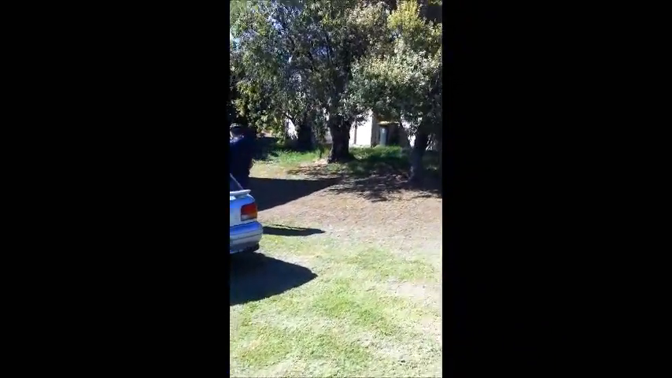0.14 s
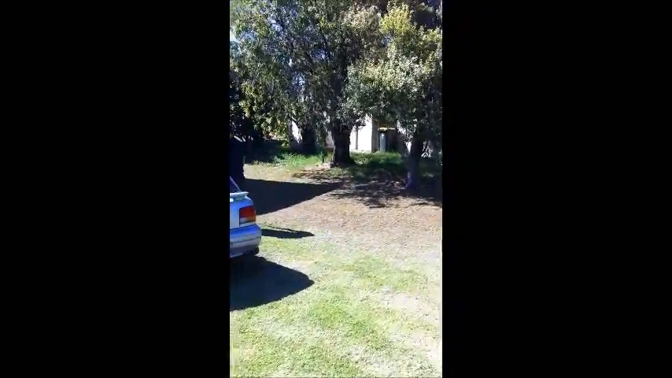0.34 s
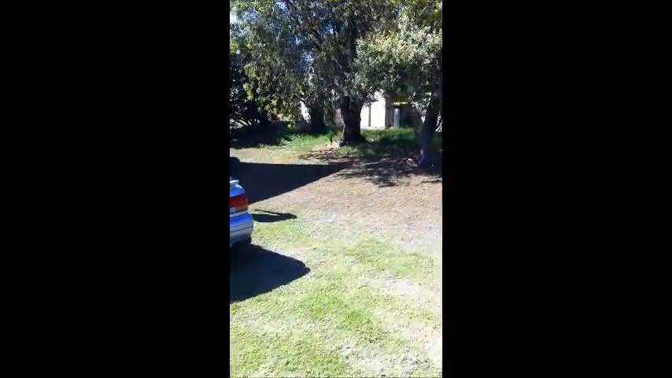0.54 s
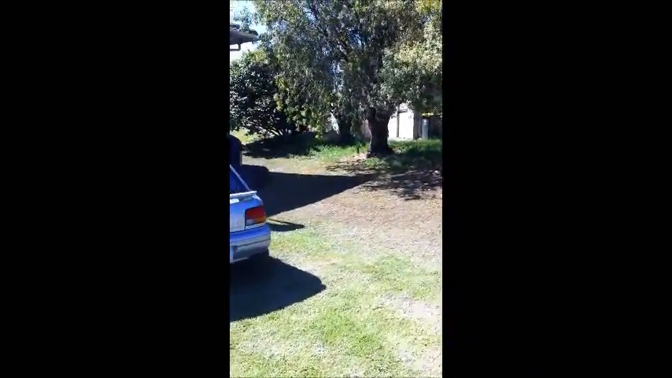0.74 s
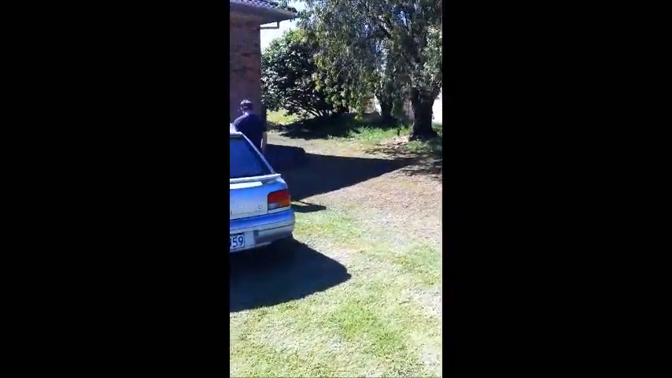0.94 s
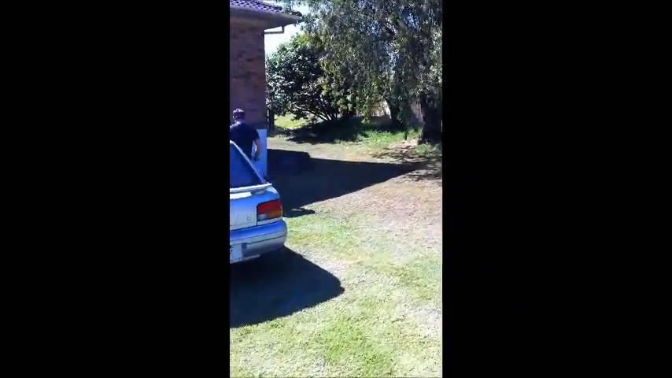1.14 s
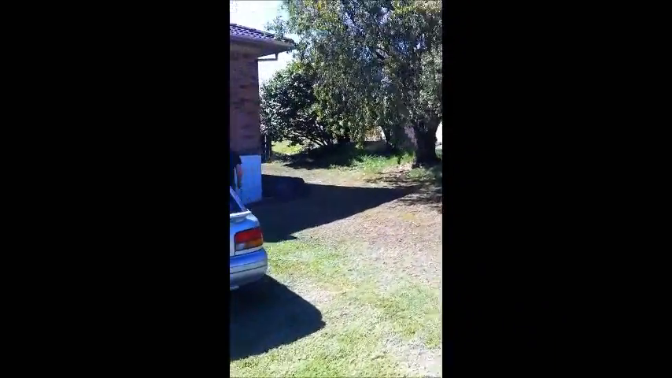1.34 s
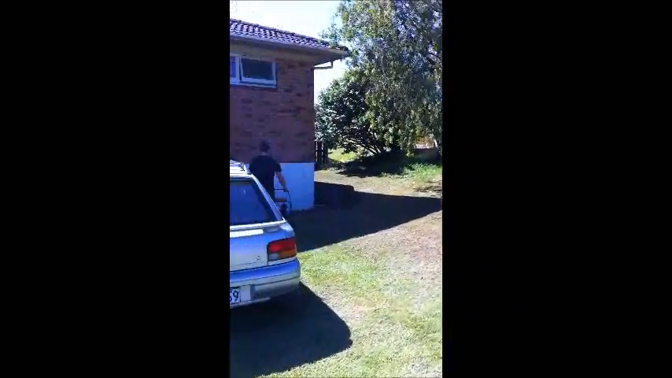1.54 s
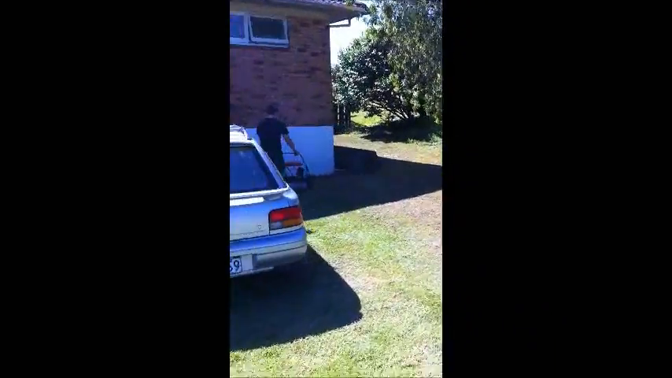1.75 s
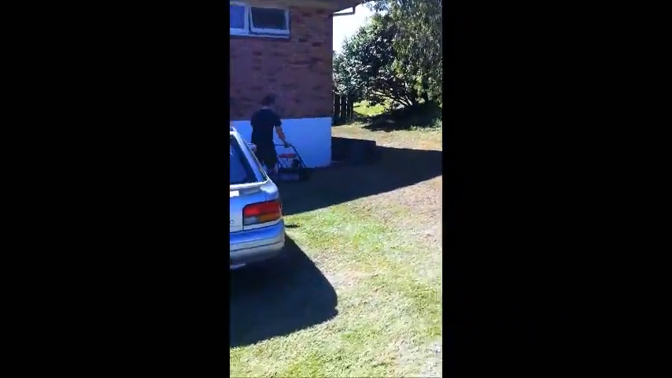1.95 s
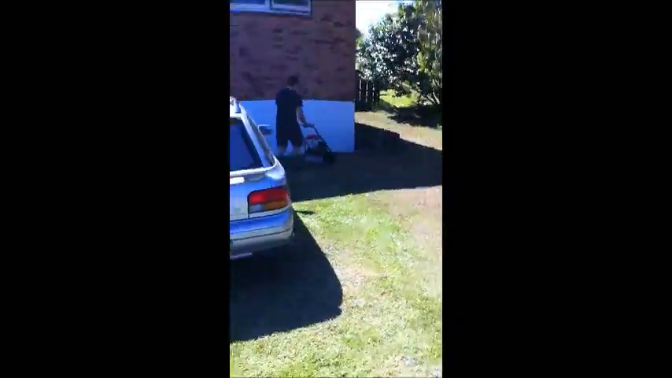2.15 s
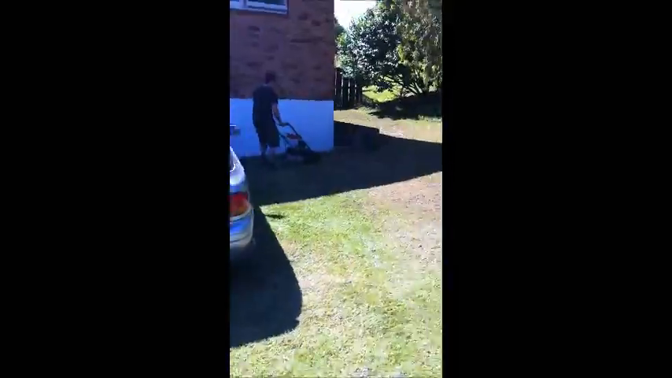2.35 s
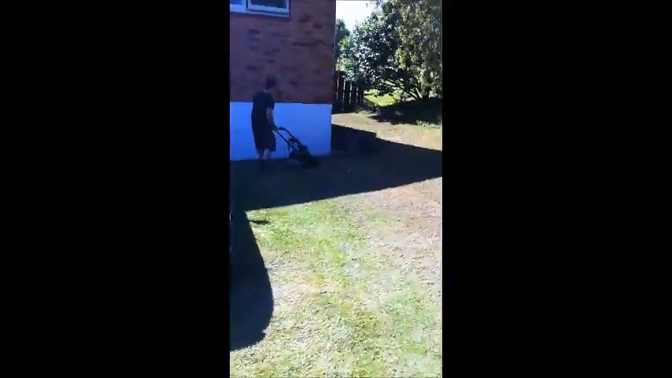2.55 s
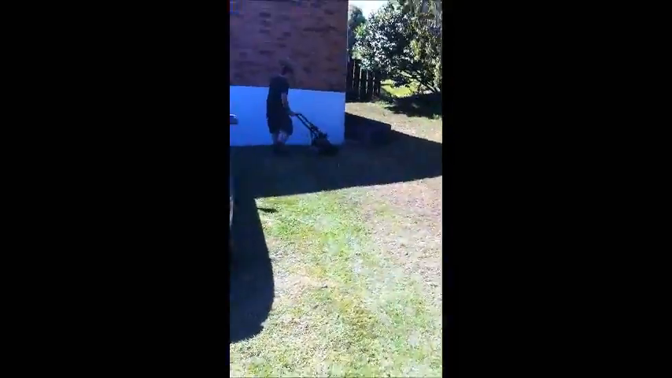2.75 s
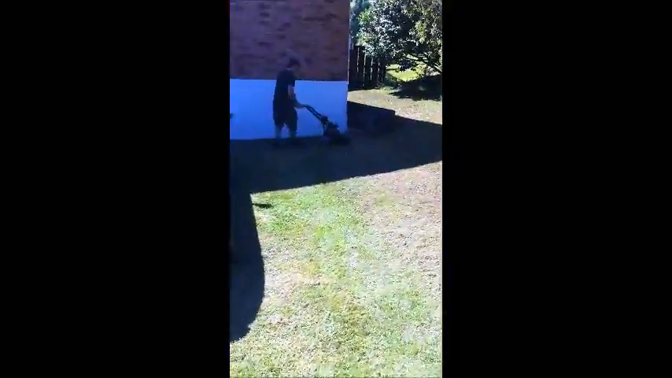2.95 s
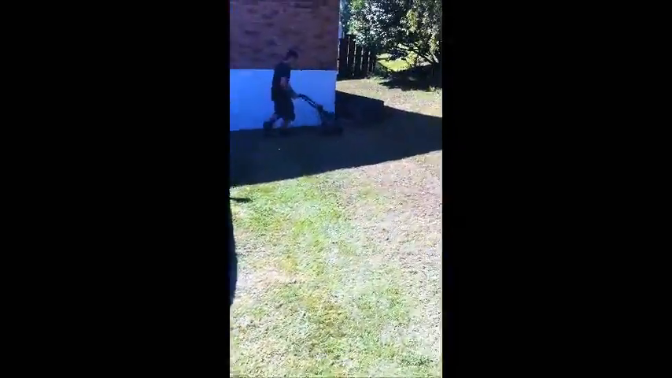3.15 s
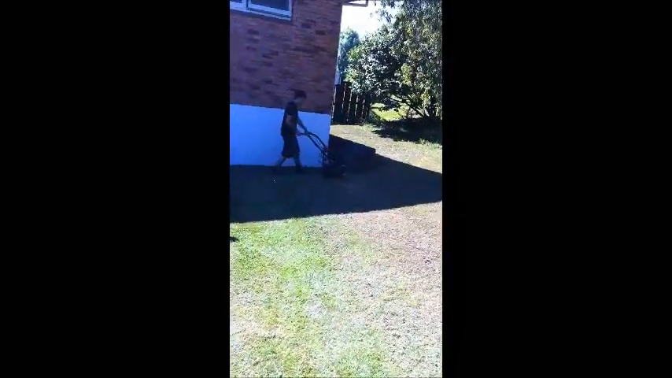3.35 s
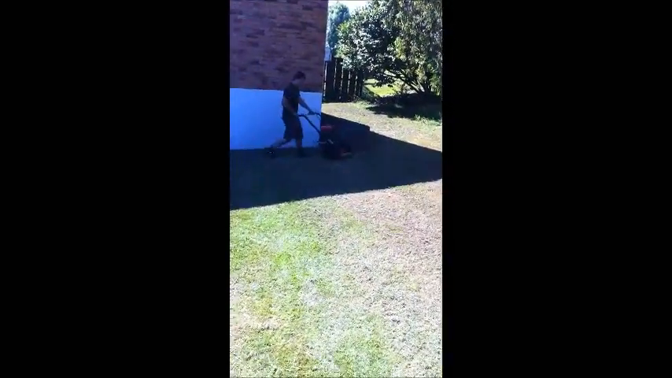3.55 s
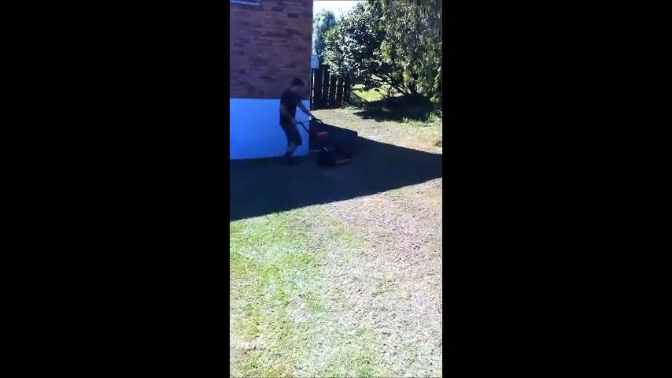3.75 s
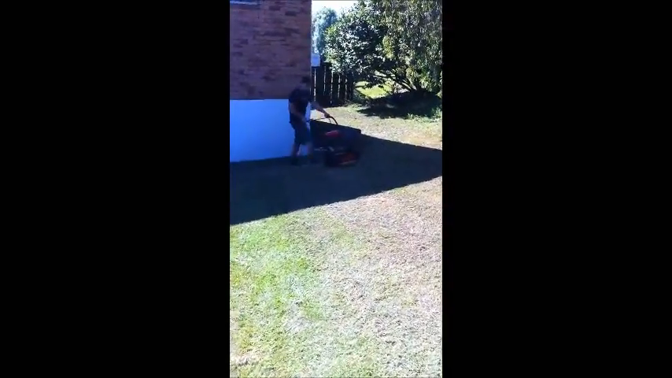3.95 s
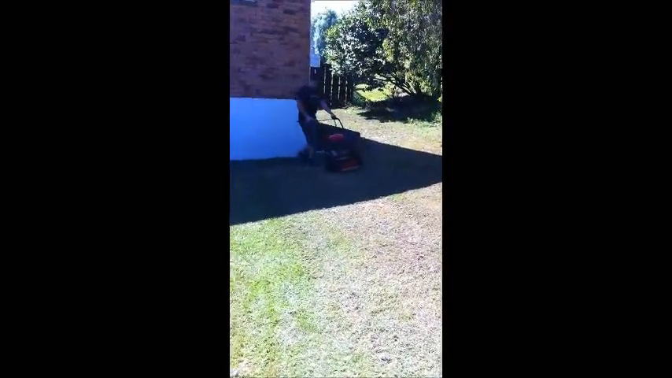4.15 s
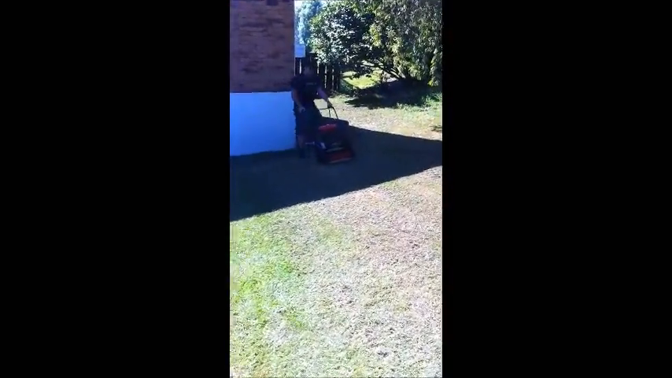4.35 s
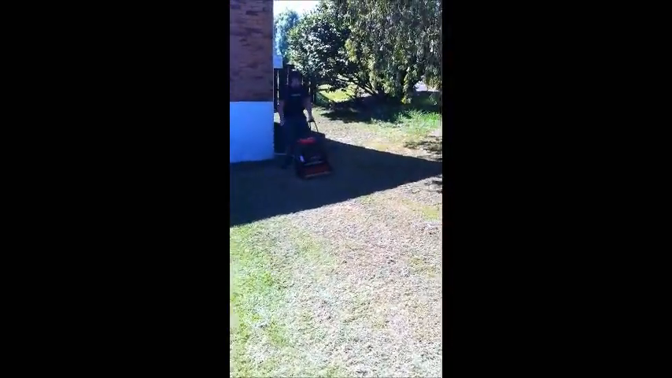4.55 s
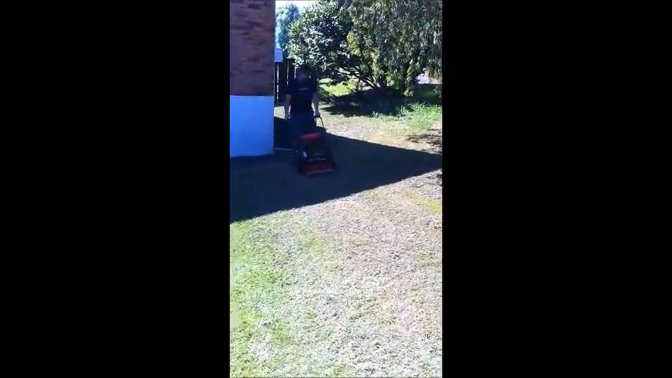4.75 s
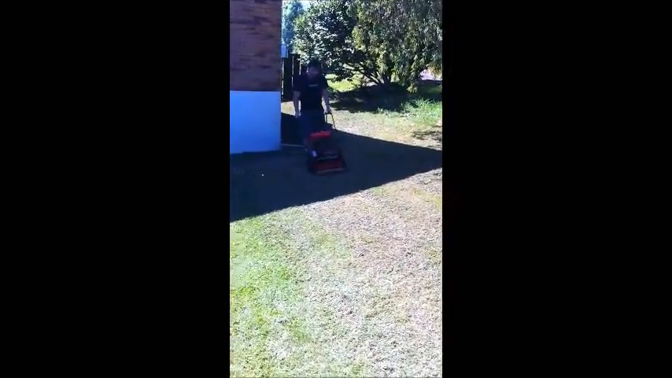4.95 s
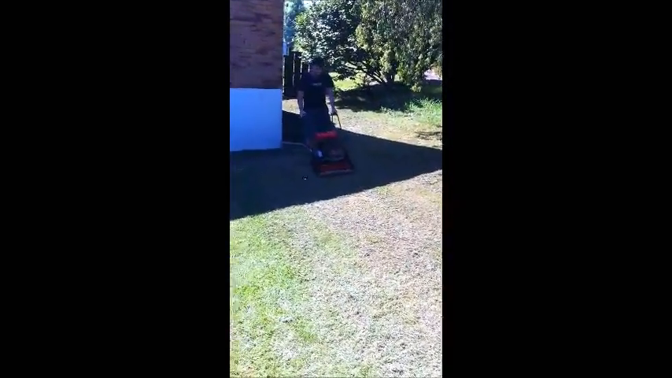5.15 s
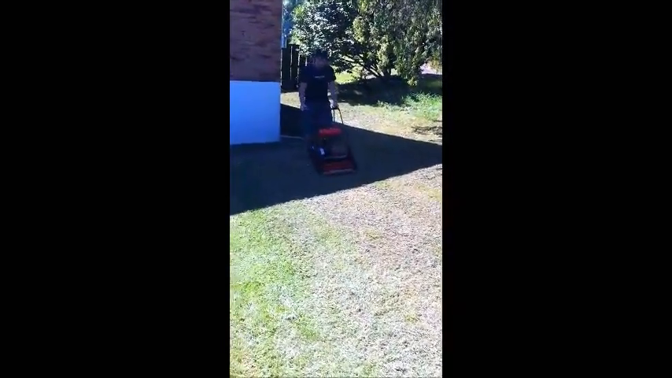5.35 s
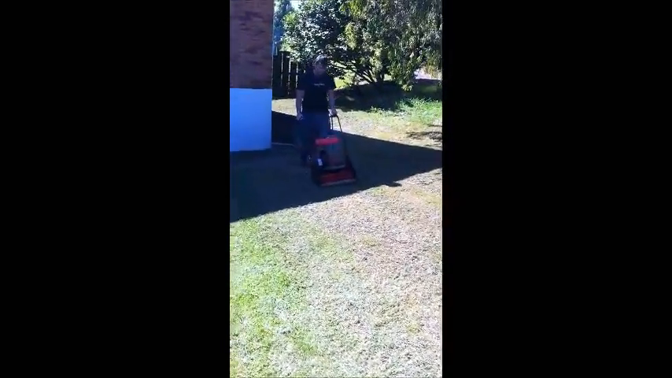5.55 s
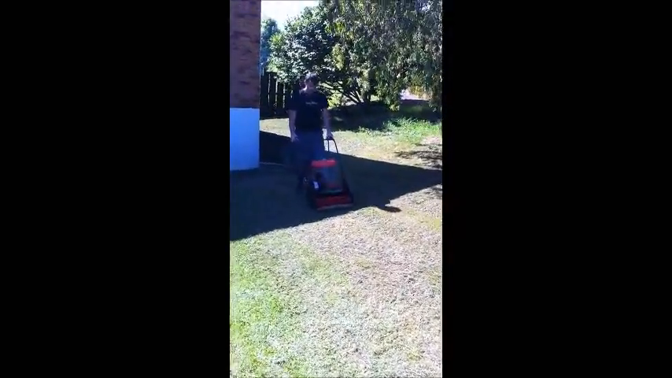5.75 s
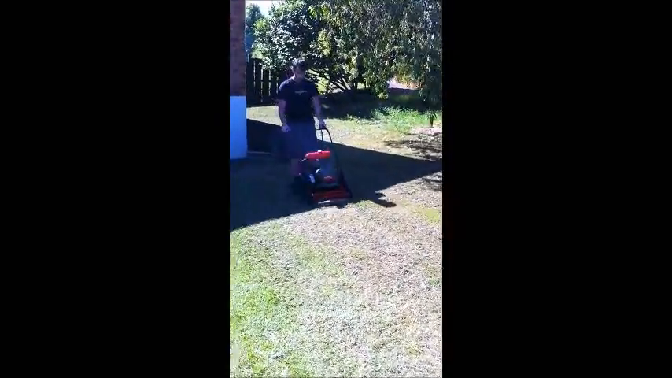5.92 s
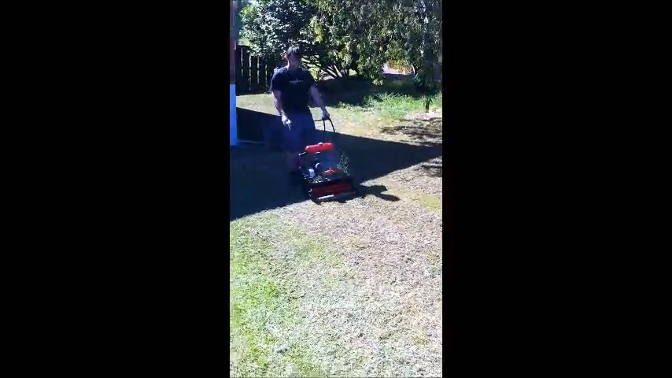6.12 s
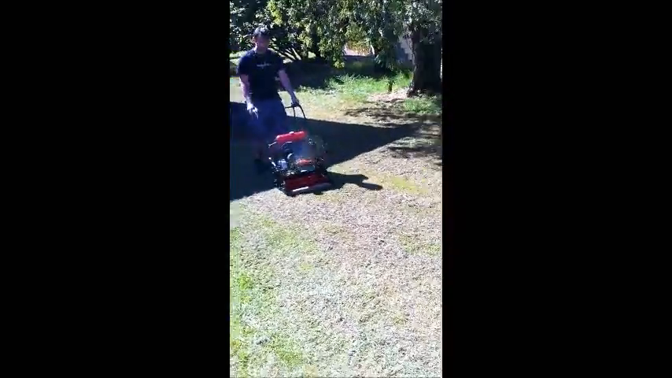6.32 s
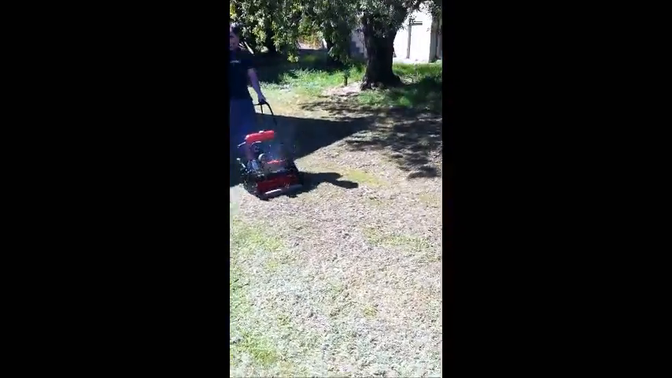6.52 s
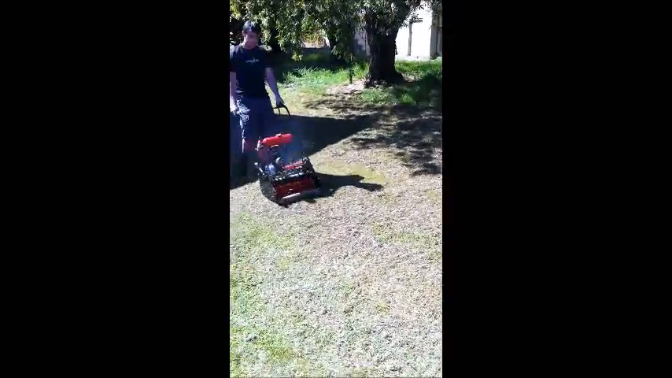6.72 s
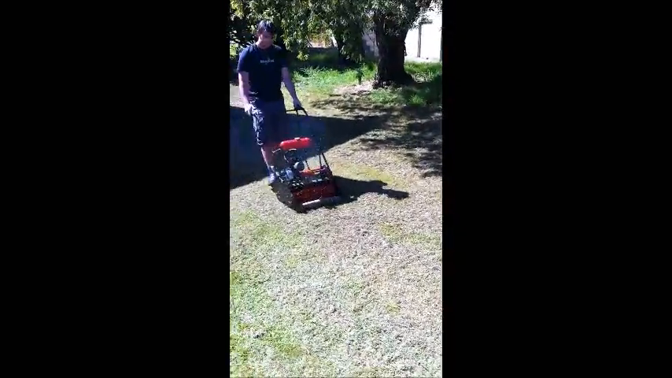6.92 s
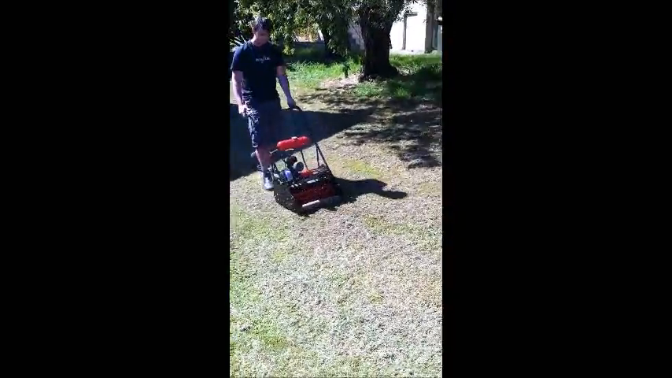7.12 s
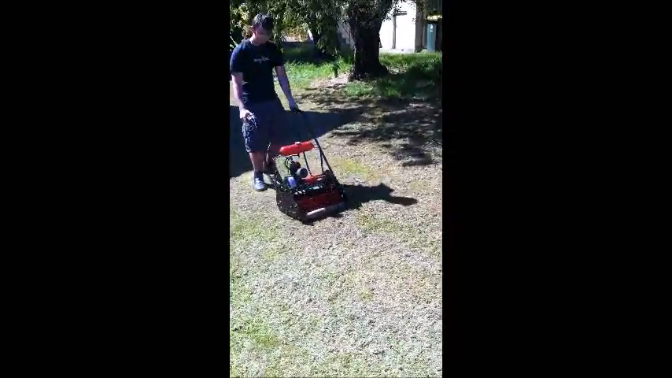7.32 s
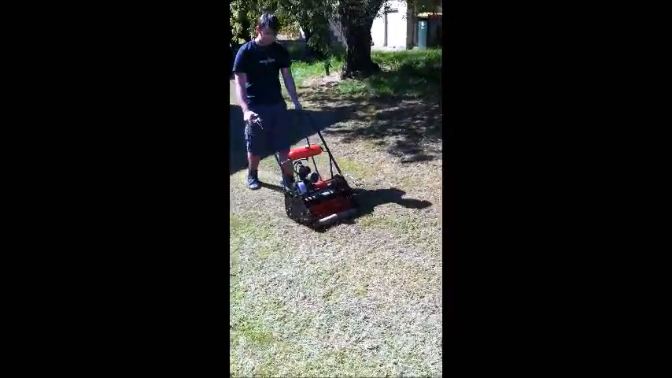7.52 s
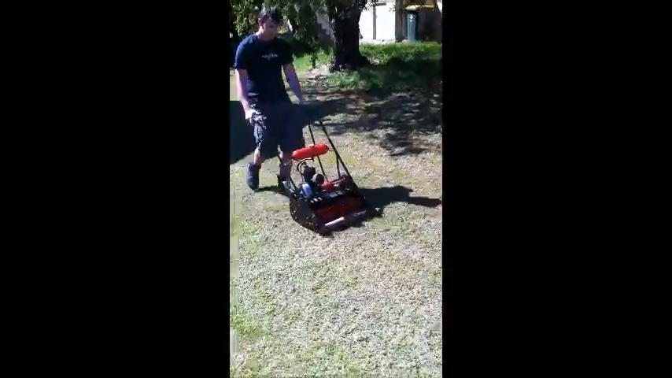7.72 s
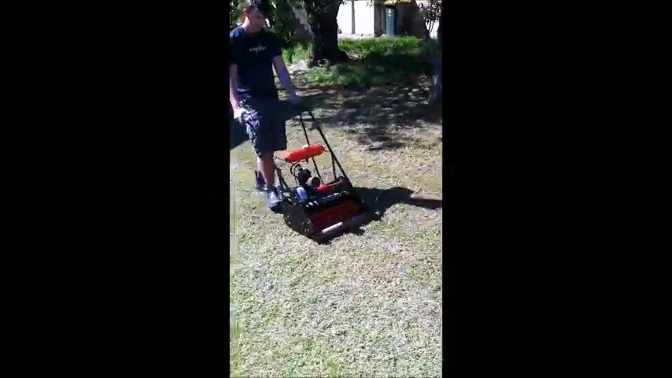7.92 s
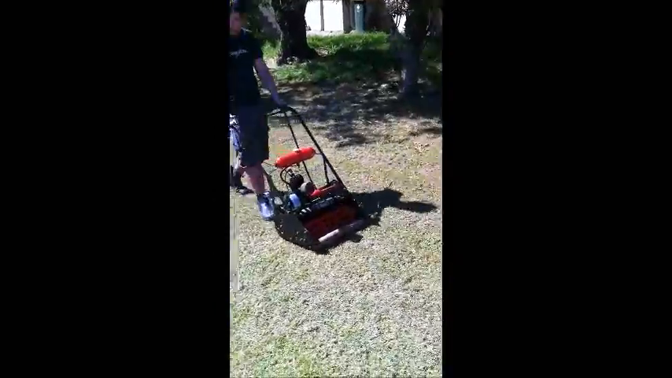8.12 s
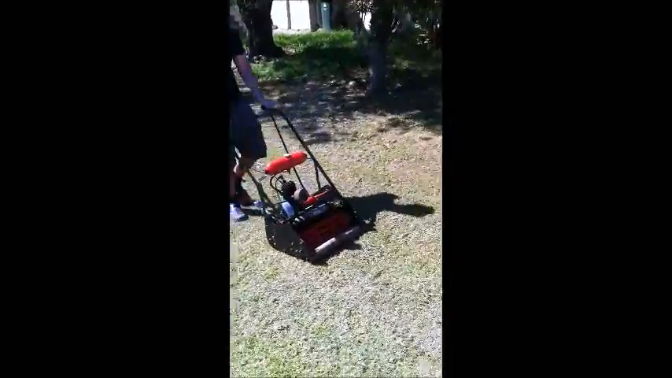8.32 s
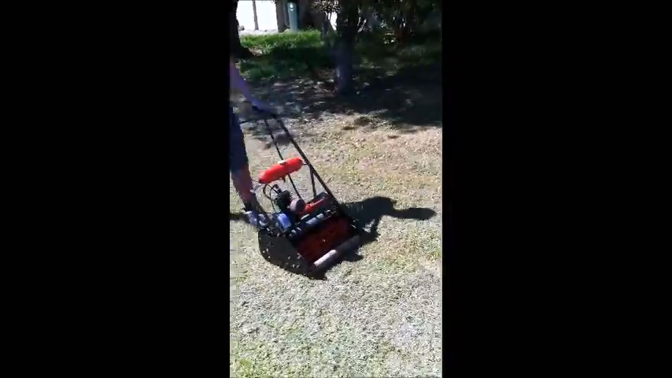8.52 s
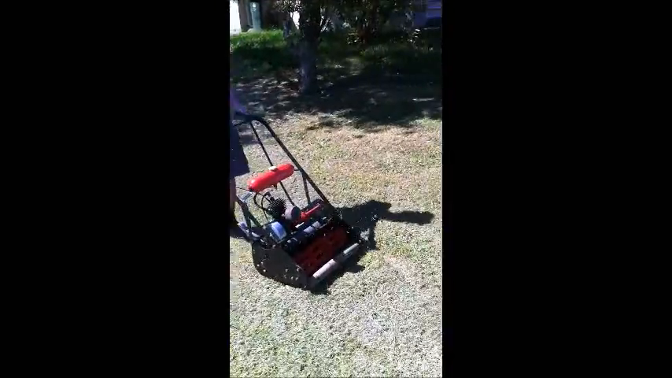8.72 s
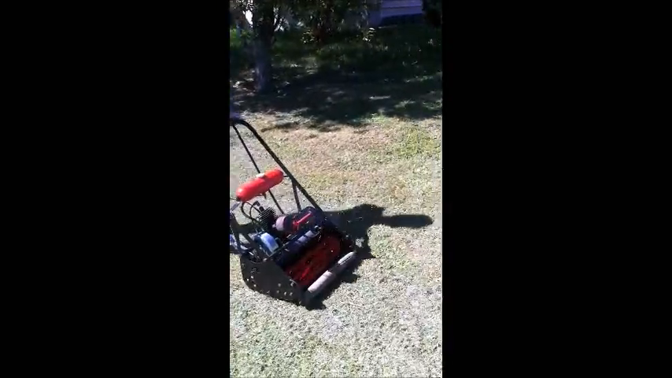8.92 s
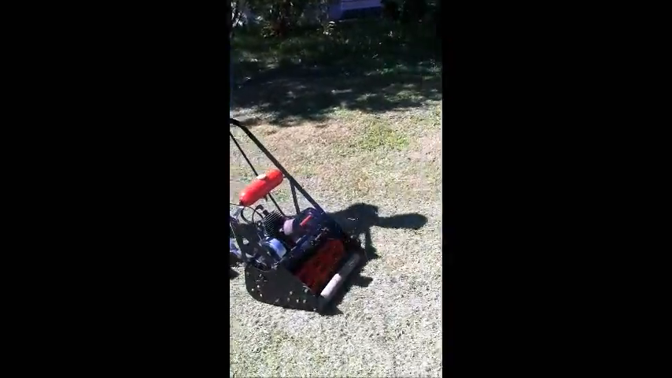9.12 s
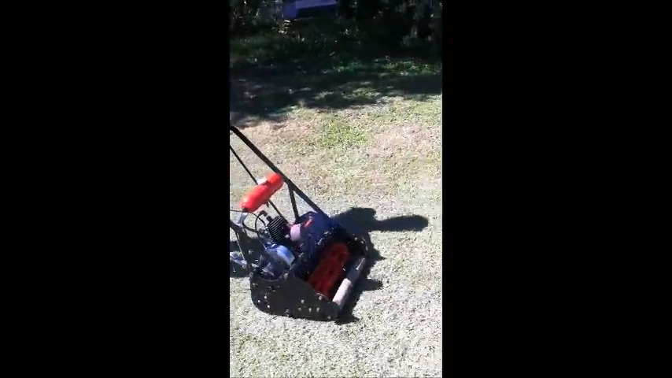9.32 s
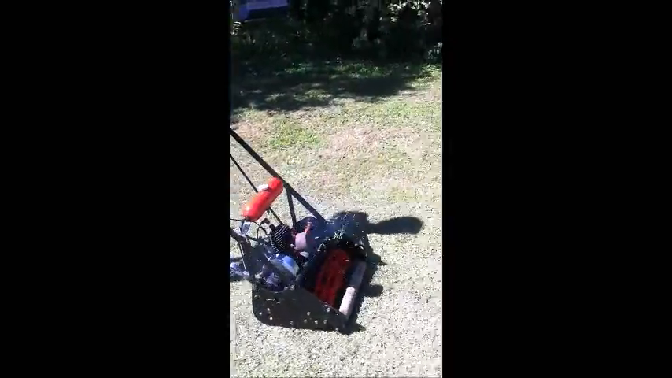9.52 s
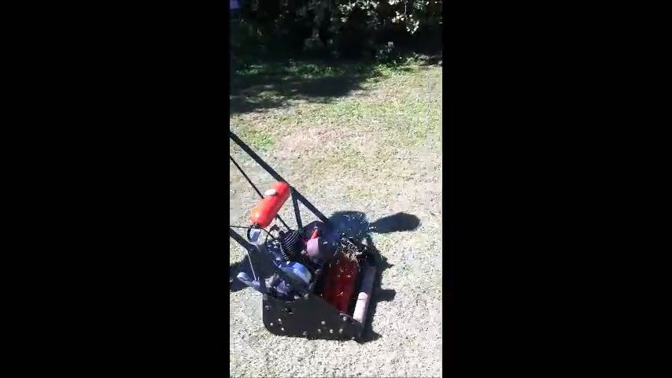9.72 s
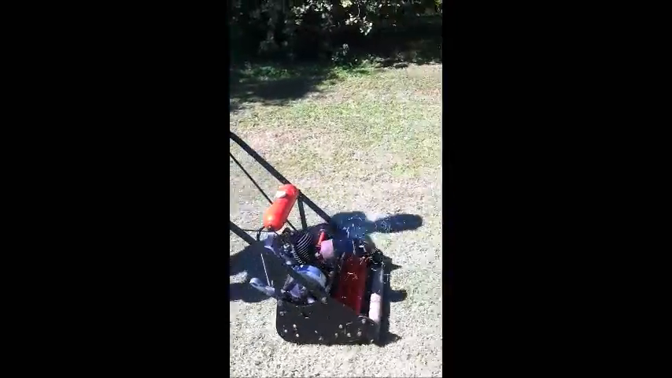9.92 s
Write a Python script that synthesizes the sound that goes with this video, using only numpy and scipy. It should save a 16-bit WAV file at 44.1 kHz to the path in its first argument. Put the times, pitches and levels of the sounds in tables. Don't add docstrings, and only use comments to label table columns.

```python
import sys
import numpy as np
from scipy import signal
from scipy.fft import rfft, irfft, next_fast_len
from scipy.io import wavfile
from scipy.ndimage import uniform_filter1d, map_coordinates

SR = 44100
rng = np.random.default_rng(int(sys.argv[2]) if len(sys.argv) > 2 else 0)


def digitize_waveform(pressure):
    field = np.atleast_2d(pressure).T
    bounded = np.clip(field, -1, 1)
    quanta = np.round(bounded * 32767).astype(np.int16)
    wavfile.write(sys.argv[1], SR, quanta)


def magnitude_from_level(level_db):
    exponent = np.asarray(level_db, float) / 20
    return 10 ** exponent


N = 439677
T = np.arange(N) / SR
TEETH = 20
VALVE = -.045


def evened(x):
    return x / np.sqrt(np.mean(x ** 2) + 1e-20)


def curves(rows):
    s, *columns = np.transpose(rows)
    return [np.interp(T, s, c) for c in columns]


def read(points, hz):
    f, value = np.transpose(points)
    return np.interp(np.log(hz + 1), np.log(f + 1), value)


def bumps(rows):
    return sum(db * np.exp(-.5 * ((T - s) / lasting) ** 2) for s, db, lasting in rows)


def wobble(seconds):
    steps = np.arange(0, T[-1] + seconds, seconds / 4)
    slow = uniform_filter1d(uniform_filter1d(rng.standard_normal(len(steps)), size=4), size=4)
    return np.interp(T, steps, evened(slow))


def clicks(turns, spread_db):
    struck = np.diff(np.floor(turns), prepend=np.floor(turns[0])) > 0
    return struck * magnitude_from_level(spread_db * rng.standard_normal(N))


def resonate(x, hz, width):
    turn = np.exp(2j * np.pi * np.cumsum(hz * np.ones(len(x))) / SR)
    r = np.exp(-np.pi * width / SR)
    return 2 * (turn * signal.lfilter([1 - r], [1, -r], x / turn)).real


def resonate_twice(x, hz, width):
    return resonate(resonate(x, hz, width), hz, width)


def filtered(x, order, hz, kind):
    return signal.sosfilt(signal.butter(order, hz, kind, fs=SR, output="sos"), x)


def delayed(x, ms):
    return map_coordinates(x, [np.arange(N) - ms * SR / 1000], order=1)


# t/s, rate/(engine cycles per s)
SPEED = [(0.0, 15.667), (0.46, 16.762), (1.33, 14.579), (2.06, 15.962), (2.48, 16.341), (3.07, 14.95),
         (3.41, 15.63), (4.03, 15.341), (4.79, 15.461), (5.33, 15.672), (5.74, 14.737), (6.4, 13.646),
         (7.4, 13.776), (7.95, 15.514), (8.37, 15.577), (8.55, 15.234), (9.38, 15.713), (10.01, 14.811)]


def cycle_rate():
    return curves(SPEED)[0]


def crank():
    return .794 + np.cumsum(cycle_rate()) / SR


# t/s, level/dB
WALK = [(0.0, -27), (0.64, -23.5), (1.19, -28.5), (1.97, -24), (2.25, -20), (2.5, -20), (3.13, -20.5),
        (4.3, -17), (5.97, -16.5), (6.08, -15), (6.33, -15.5), (6.78, -14.5), (7.5, -13.5), (7.83, -11),
        (8.05, -13), (8.08, -12), (9.83, -12), (9.97, -11)]


def walk_level():
    return curves(WALK)[0]


def nearness():
    return walk_level() + 17


# level at middle distance/dB, share of nearness/1, share of swing/1
PARTS = [
    (-28.5, 0.78, 0.55),
    (-22, 0.83, 0.11),
    (-20.5, 0.83, -0.39),
    (-26, 0.82, 0.069),
]
# t/s, level/dB
SWING = [(0, 1), (1, -2.5), (1.6, 5.5), (2.2, -1.5), (3, 4.5), (3.7, 8.5), (4.2, -2), (5.5, 2), (6.1, -3),
         (7, 0.5), (9, 0.5), (9.97, 9)]


def part_db(db, near, swing):
    return db + near * nearness() + swing * curves(SWING)[0]


def gears(cycle):
    tooth = TEETH * cycle + .035 * wobble(.004)
    scrape = (3.8 + np.exp(-(tooth % 1) / .5)) * rng.standard_normal(N)
    blows = clicks(tooth, 1.8)
    spread = rng.standard_normal((3, 400)) * magnitude_from_level(-60 * T[:400] / 0.011)
    facing = np.cos(np.pi * (0.9044 * T + np.arange(3)[:, None] / 3))
    blows = sum(f * signal.oaconvolve(blows, h)[:N] for f, h in zip(facing, spread))
    blows = filtered(blows, 2, [1480, 6500], "band")
    load_db = 0.3 * np.cos(2 * np.pi * (cycle - .25)) + .5 * np.cos(4 * np.pi * (cycle - .05))
    load_db = load_db + 0.72 * wobble(0.019)
    return magnitude_from_level(load_db) * (.5 * evened(blows) + 1.28 * evened(scrape))


# f/Hz, level/(dB per Hz)
BEHIND = [(180, -43), (300, -29), (420, -21.5), (603, -9), (737, -13.5), (915, -12), (1340, -12),
          (1720, -5), (1900, -1.5), (2360, -10), (3900, -3.5), (5430, -9.5), (6520, -3.5), (7690, -9),
          (12700, -11), (16000, -28.5)]
# f/Hz, level/(dB per Hz)
FRONT = [(180, -70), (300, -16), (392, -33), (450, -23), (667, -7.5), (994, -20), (1210, -11.5),
         (1660, -6.5), (1900, -4), (2360, -9.5), (4440, -4.5), (4830, 0), (5340, -9.5), (6410, -11.5),
         (10900, -14), (16000, -30)]
SPLITS_HZ = [1150, 2600, 5600]
# t/s, level/dB, lasting/s
SPRAYS = [
    (.6, 1, 0.11),
    (2.7, 5, 0.13),
    (3.87, 4, 0.13),
    (6.85, 0.5, 0.08),
    (7.3, 0, .08),
    (9.5, 3.5, 0.58),
]


def rattle(drive):
    hz, t, z = signal.stft(drive, SR, nperseg=512, noverlap=384)
    front = np.clip((t - 5.5) / 3.2, 0, 1)
    patches = rng.standard_normal((len(t), len(hz)))
    patches = evened(uniform_filter1d(uniform_filter1d(patches, 24, axis=0), 3, axis=1)).T
    colour_db = np.outer(read(BEHIND, hz), 1 - front) + np.outer(read(FRONT, hz), front)
    z = z * magnitude_from_level(colour_db + 1.52 * patches * np.clip(hz / 2000, .4, 1)[:, None])
    above = [1] + [1 / (1 + (f / (hz + 1)) ** 12) for f in SPLITS_HZ] + [0]
    levels = [part_db(*p) for p in PARTS]
    levels[-1] = levels[-1] + bumps(SPRAYS)
    out = 0
    for low, high, db in zip(above, above[1:], levels):
        part = z * np.sqrt(np.clip(low - high, 0, 1))[:, None]
        part = part / np.sqrt(uniform_filter1d((abs(part) ** 2).sum(0), 150))
        out = out + magnitude_from_level(db - 4.0) * evened(signal.istft(part, SR, nperseg=512, noverlap=384)[1][:N])
    return out


def striped(x):
    hz, t, z = signal.stft(x, SR, nperseg=2048, noverlap=1536)
    field = uniform_filter1d(rng.standard_normal(z.shape), size=2, axis=0)
    field = evened(uniform_filter1d(field, size=14, axis=1))
    drift = np.round(1.5 * np.interp(t, T, wobble(.1))).astype(int)
    field = np.take_along_axis(field, (np.arange(len(hz))[:, None] + drift) % len(hz), axis=0)
    depth_db = 2.8 * np.clip(np.minimum(1.6 - hz / 7000, hz / 1600), .55, 1)[:, None]
    gain = magnitude_from_level(depth_db * field)
    return signal.istft(z * evened(gain), SR, nperseg=2048, noverlap=1536)[1][:N]


# far f/Hz, near f/Hz, level over nearness/dB
REEL_HZ = [
    (1937, 1885, -10),
    (3166, 3140, -13),
    (4910, 4870, -12),
]
# width/Hz, level share/dB
RINGS = [
    (70, -4.5),
    (130, -15),
    (150, -7.5),
]
# t/s, level/dB, lasting/s
FLARES = [
    [(1.7, 6, .25), (2.42, 12.5, 0.18), (3, 10, .12), (3.5, 3, .2), (5.05, 2, 0.11), (6.7, 8.5, 0.49),
     (7.3, 2.5, 0.13), (8.3, 7.5, 0.39), (8.65, 0.5, 0.08), (9, 5.5, 0.077), (9.17, 3, 0.037),
     (9.31, 9, 0.026), (9.45, 4, 0.1), (9.66, 2.5, .1), (9.9, 2, .08)],
    [(2.2, 20, .1), (3.5, 11, .12), (4.3, 11, .12), (6.0, 6, .12), (7.1, 6, 0.14), (7.8, 12, 0.14),
     (8.3, 12, 0.2), (8.7, 9, 0.19), (9.15, 15.5, 0.22)],
    [(.3, 15, 0.76), (2.5, 10, 0.17), (3.9, 11, 0.1), (6.15, 10.5, 0.085), (7.75, 9, 0.11), (7, 8, 0.22),
     (8.5, 4, 0.091), (8.9, 11, 0.25), (9.2, 5.5, 0.057), (9.7, 13, 0.19)],
]
TOOTH_PULL = [0.72, 0.45, 0.66]
WHINE = [.93, .55, .7]
# t/s, pitch share/1, lasting/s
REEL_FLEX = [
    (8.05, -0.029, .22),
    (2.32, -.015, 0.17),
    (4.2, .015, .12),
]
# t/s, depth/dB, place in the cycle/1
RING_LULL = [(0, 1, .3), (2.2, 2, .3), (4, 2, .3), (4.3, 1.5, .7), (5.8, 1.5, .7), (6.1, 4.5, 1.02),
             (7.4, 5, 1), (7.7, 9, .76), (8.75, 10, .76), (8.95, 4.5, .82), (10, 4, .8)]


def reel(drive, cycle):
    out = np.zeros(N)
    tooth_hz = TEETH * cycle_rate()
    depth_db, place = curves(RING_LULL)
    lull_db = depth_db * (.25 - np.exp(3 * (np.cos(2 * np.pi * (cycle - place)) - 1)))
    rings = zip(REEL_HZ, FLARES, RINGS, TOOTH_PULL, WHINE)
    for (far_hz, near_hz, over_db), flares, (width, share_db), pull, whine in rings:
        hz = far_hz + (near_hz - far_hz) * T / T[-1]
        hz = hz * (1 + bumps(REEL_FLEX) * (near_hz > 2500))
        hz = hz - pull * tooth_hz / (2 * np.pi) * np.sin(2 * np.pi * hz / tooth_hz)
        hz = hz * (1 + .004 * wobble(.06))
        db = walk_level() + over_db + bumps(flares) + lull_db * (near_hz < 2500)
        db = db + share_db + .9 * wobble(.08) - 4 * np.clip(1 - T / 8, 0, 1)
        ring = evened(resonate(resonate(drive, hz, width), hz, 3 * width))
        sagging = hz * (1 - .035 * ((cycle - VALVE) % 1 - .6) + .004 * wobble(.008))
        tone = np.sqrt(2) * np.sin(2 * np.pi * np.cumsum(sagging) / SR)
        steady = whine * np.clip(T / 2.2, .3, 1)
        out += magnitude_from_level(db) * (np.sqrt(1 - steady ** 2) * ring + steady * tone)
    return out


# f/Hz, width/Hz, level over rattle/dB, loudest t/s, lasting/s
FRAME = [(3700, 290, -3, .6, 0.16), (4280, 90, -11, 5, 0.2), (790, 130, -11, 1.12, 0.29),
         (922, 114, -10, 3.15, 0.71), (610, 19, -18, 3.2, 0.26), (1513, 26, -9.5, 3.13, 0.5),
         (2150, 19, -17, 3.1, 0.75), (2152, 73, -7, 5.47, 1), (3720, 120, -19, 5.6, 0.37),
         (1560, 40, -15.5, 7.3, 1), (6480, 92, -12.5, 7.3, 1), (3716, 66, -6.5, 8.23, 0.51),
         (1190, 96, -13.5, 8.93, 0.55), (4350, 200, -14, 9.65, 0.36), (1490, 170, -11, 10.1, 0.59),
         (6290, 230, -11, 8.94, 0.84), (8360, 190, -12, 11.6, 0.84), (2590, 140, -10, 6.8, 1),
         (4230, 40, -7, 5.6, 0.13), (4090, 60, -8, 6.07, 0.12), (2000, 46, -11, 0.89, 0.13),
         (1890, 50, -10, 0.92, .06), (2010, 70, -7, 1.4, .09), (1610, 40, -12, .1, .07),
         (2155, 56, -16, 1.85, .15), (1970, 45, -5, 9.43, .035), (2040, 60, -14, .25, .12),
         (510, 42, -20, 6.44, 0.27), (516, 49, -18, 7.35, 0.16), (8350, 120, -16, 9.42, .08),
         (8900, 150, -17, 9.82, 0.089), (10500, 500, -15, 7.22, .02), (10500, 600, -14, 9.53, .03),
         (7160, 300, -15, 9.1, 0.13), (6600, 120, -18, 7.8, .12), (2090, 30, -8, 4.78, 0.22),
         (4070, 300, -15, 8.1, 0.12), (248, 10, -25, 3.3, .45), (156, 12, -24, 2.1, .4)]
# f/Hz, level over rattle/dB, loudest t/s
GLINTS = [(4400, -12, 2.23), (2590, -12, 2.47), (2304, -6, 2.43), (4700, -15, 2.5), (3350, -12, 2.67),
          (3440, -11.5, 3.45), (4720, -10, 3.65), (4980, -22, 3.9), (4050, -7, 4.32), (3620, -8, 4.3),
          (2550, -6.5, 4.33), (3040, -10, 4.16), (4270, -18, 4.8), (4340, -10, 6.9), (2730, -17, 3.05),
          (2480, -17, 2.8), (4240, -15, 4.3), (3270, -12, 5.9), (2680, -12, 6.8), (3270, -11, 7.05),
          (2470, -13, 7.5), (3750, -11, 7.7), (2990, -10, 7.7), (3050, -7, 8.3), (1650, -14, 6.63),
          (1633, -13, 7.5), (3830, -17, 5.2), (3870, -14, 2.7)]


def frame_faces(drive):
    out, near_db = np.zeros(N), part_db(*PARTS[1])
    waver = [1 + .009 * wobble(.15) for _ in range(3)]
    plates = [(f, f / 90, db, s, 0.17) for f, db, s in GLINTS]
    for hz, width, db, s, lasting in FRAME + plates:
        span = slice(max(round((s - 3 * lasting) * SR), 0), round((s + 3 * lasting) * SR))
        shown = magnitude_from_level(near_db[span] + db) * np.exp(-.5 * ((T[span] - s) / lasting) ** 2)
        wavering = hz * waver[round(hz) % 3][span]
        out[span] += shown * evened(resonate(drive[span], wavering, width))
    return out


# t/s, depth/dB, lasting/s
SLACKS = [(3.155, 3.5, 0.0056), (6.561, 5, 0.0033), (7.583, 1.5, 0.0057), (7.91, 3, 0.012),
          (8.046, 3.5, 0.0045), (8.302, 2.5, 0.0069), (8.362, 4.5, 0.0043), (8.495, 2, 0.0049),
          (8.629, 4.5, 0.0093), (8.825, 3, 0.0058), (9.338, 5, 0.0032), (9.531, 5, 0.0063)]


def slack():
    return magnitude_from_level(-bumps(SLACKS))


# t/s, extra path/ms, share/1
BOUNCE = [
    (0, 1.36, 0.12),
    (2.2, 1.37, 0.19),
    (3.5, 2.16, 0.04),
    (3.9, 2.04, 0.16),
    (4.4, 1.84, 0.02),
    (4.7, 1.01, 0),
    (10, 0.97, 0.15),
]


def metal(cycle):
    drive = gears(cycle)
    direct = slack() * (striped(rattle(drive)) + reel(drive, cycle) + frame_faces(drive))
    ms, share = curves(BOUNCE)
    return (direct + share * delayed(direct, ms)) / np.sqrt(1 + share ** 2)


def exhaust(cycle):
    fire = clicks(cycle + .044, 0.98)
    thump = evened(resonate_twice(fire, 170, 120))
    crack = evened(resonate_twice(fire, 235, 190))
    return filtered(-thump - 0.28 * crack, 2, 85, "high"), crack


def wall_echoes(firing):
    walls = rng.standard_normal((2, 12000)) * magnitude_from_level(-60 * T[:12000] / .28)
    sent = firing + 0.19 * resonate(firing, 260, 60) - .5 * resonate(firing, 194, 30)
    first, second = [signal.oaconvolve(sent, h)[:N] for h in walls]
    return evened(np.sin(1.405 * T) * first + np.cos(1.405 * T) * second)


# t/s, place in the cycle/1
INTAKE = [
    (0, .57),
    (2.8, .53),
    (3.1, .47),
    (4.6, .47),
    (5, .495),
    (10, .49),
]


def intake_puff(cycle, view):
    suck = clicks(cycle - curves(INTAKE)[0] + .006 * wobble(.05), 2.)
    puff = evened(resonate_twice(suck, 216, 160))
    return -puff - 0.41 * view * evened(resonate_twice(suck, 135, 90))


# t/s, share/1
SLAP = [
    (0, .1),
    (5, .25),
    (7, .2),
    (7.7, 0.32),
    (10, 0.43),
]


def wall_slap(puffs):
    return -curves(SLAP)[0] * resonate(delayed(puffs, 18.07), 230, 160)


# f/Hz, level/(dB per Hz)
WASH = [(15, -71), (25, -41), (59, -48), (112, -5), (194, 0), (253, -8), (281, -26), (313, -12),
        (600, -2.5), (780, -32), (1320, -120)]


def exhaust_wash():
    size = next_fast_len(N)
    hz = np.fft.rfftfreq(size, 1 / SR)
    colour = magnitude_from_level(read(WASH, hz)) * (hz < 600)
    return evened(irfft(rfft(rng.standard_normal(size)) * colour, size)[:N])


# t/s, level/dB, lasting/s
HUM_SWELLS = [
    (1.7, 4, .3),
    (2.6, -3.5, .4),
    (3.2, -2, .2),
    (3.8, 1.5, .3),
    (5.1, 6, .2),
    (8.3, 5.5, .6),
    (9.4, 2, .3),
]


def tooth_hum(cycle):
    db = -46 + 0.49 * nearness() - 3.5 * np.maximum(15.5 - cycle_rate(), 0)
    uneven_db = 1.8 * wobble(0.05) + bumps(HUM_SWELLS) + 2.1 * np.cos(2 * np.pi * (cycle - .2))
    tone = np.sin(2 * np.pi * (TEETH * cycle + 0.076 * wobble(0.03)))
    return magnitude_from_level(db) * evened(tone * magnitude_from_level(uneven_db))


# t/s, level/dB, lasting/s
TICK_GLIMPSE = [
    (.5, 6, .35),
    (9.8, -3, .2),
]


def valve_tick(cycle):
    hidden = np.clip((3.92 - T) / .2 + .5, 0, 1)
    db = -40.5 + .75 * nearness() - 12 * hidden + bumps(TICK_GLIMPSE)
    decay = np.exp(-1 / (.0011 * SR))
    burst = signal.lfilter([1], [1, -decay], clicks(cycle - VALVE, 2.5)) * rng.standard_normal(N)
    bright = filtered(burst, 2, [11800, 14600], "band")
    body = np.clip(T / 2.5 - 1, 0, 1.3) * filtered(burst, 2, [7000, 11500], "band")
    return magnitude_from_level(db) * evened(bright + body)


# t/s, level/dB, in direct view/1
PIPE = [
    (0, -41.5, 0.46),
    (1.4, -45, 0.25),
    (2.2, -43, 0.37),
    (3, -43.5, 0.2),
    (4.3, -38, 0.7),
    (5.7, -37, 0.6),
    (7, -35.5, 0.83),
    (8.5, -38, 0.9),
    (9.97, -37, 0.93),
]


def engine(cycle):
    pipe_db, view = curves(PIPE)
    firing, crack = exhaust(cycle)
    intake = evened(intake_puff(cycle, view))
    firing_gain = magnitude_from_level(pipe_db - 7.5 * (1 - view))
    intake_gain = magnitude_from_level(pipe_db - 9)
    wash = 0.38 * exhaust_wash() + 0.63 * (1 - 0.81 * view) * wall_echoes(firing)
    pipe = firing_gain * evened(firing) + intake_gain * intake + magnitude_from_level(pipe_db - 4.5 * view) * evened(wash)
    slap = wall_slap(firing_gain * crack + intake_gain * intake)
    return pipe + slap + valve_tick(cycle) + tooth_hum(cycle)


# t/s, peak level/dB, f/Hz, t60/s
KNOCKS = [(0.079, -28, 360, 0.073), (0.123, -28, 345, 0.1), (0.219, -25, 302, 0.04),
          (1.036, -21, 210, 0.05), (1.055, -23, 288, 0.04), (1.076, -23, 370, 0.05),
          (1.082, -23, 210, 0.08), (1.094, -19, 186, 0.099), (1.103, -25, 330, 0.05),
          (1.114, -24, 230, 0.06), (1.124, -20, 165, 0.07), (1.132, -26, 190, 0.06),
          (1.188, -25, 230, 0.035), (4.678, -9.5, 340, 0.026), (4.678, -16.5, 220, 0.087),
          (4.686, -20, 340, 0.04), (4.702, -13, 330, 0.04), (4.704, -15, 450, 0.043),
          (4.714, -18, 194, 0.053), (4.602, -25, 178, .1), (4.622, -24, 220, .05), (4.735, -26, 170, 0.16)]


def knocks():
    out, t = np.zeros(N), T[:4000]
    for s, db, hz, t60 in KNOCKS:
        push = magnitude_from_level(db - 60 * t / t60) * np.sin(2 * np.pi * hz * t) * np.minimum(t * hz / 0.5, 1)
        out[round(s * SR):][:len(t)] += 1.05 * push
    return out


# t/s, level/dB, lasting/s
FIZZ = [
    (.6, 6, .15),
    (2.7, 14, .15),
    (3.87, 12, .12),
    (9.8, 19.2, .2),
]


def fizz():
    return magnitude_from_level(-51 + bumps(FIZZ)) * evened(filtered(rng.standard_normal(N), 4, 14500, "high"))


# t/s, level/dB, lasting/s
GUSTS = [
    (.5, 9, .4),
    (2, 7, .4),
    (2.9, 4, .3),
    (4.85, 11, .08),
    (9.95, 9, .1),
]


def rumble():
    return magnitude_from_level(-57 + bumps(GUSTS)) * evened(filtered(rng.standard_normal(N), 2, [12, 130], "band"))


def scene():
    cycle = crank()
    return np.tile(metal(cycle) + engine(cycle) + knocks() + fizz() + rumble(), (2, 1))


def low_pass(x):
    return signal.sosfilt(signal.butter(12, 15790, fs=SR, output="sos"), x)


def record(dry):
    cut = filtered(1.255 * np.tanh(dry[0] / 1.17), 2, 110, "high")
    hz, t, z = signal.stft(cut, SR, nperseg=2048, noverlap=1024)
    power = abs(z) ** 2
    patch = uniform_filter1d(uniform_filter1d(power, size=6, axis=0), size=3, axis=1)
    around = uniform_filter1d(uniform_filter1d(power, size=61, axis=0), size=11, axis=1)
    gate_db = np.interp(hz, [7000, 12000, 15000, 15900], [-5.5, -3, -1.9, -2])[:, None]
    passed = (patch > around * magnitude_from_level(2 * gate_db)) | (hz < 7000)[:, None]
    gated = signal.istft(z * passed, SR, nperseg=2048, noverlap=1024)[1]
    return low_pass(np.tile(gated[:N], (2, 1)))


dry = scene()
out = record(dry)
digitize_waveform(out)
```